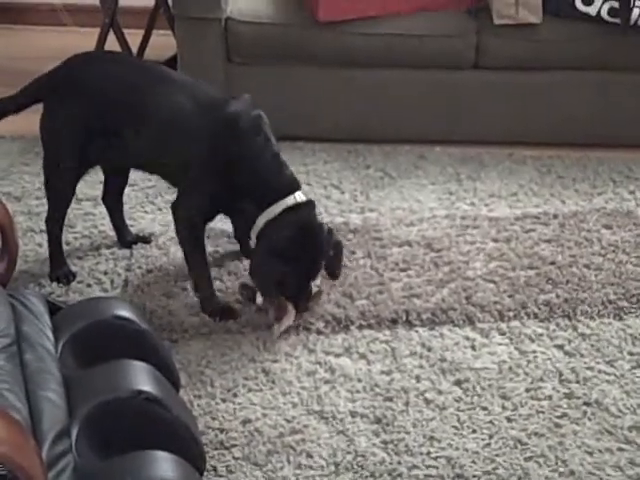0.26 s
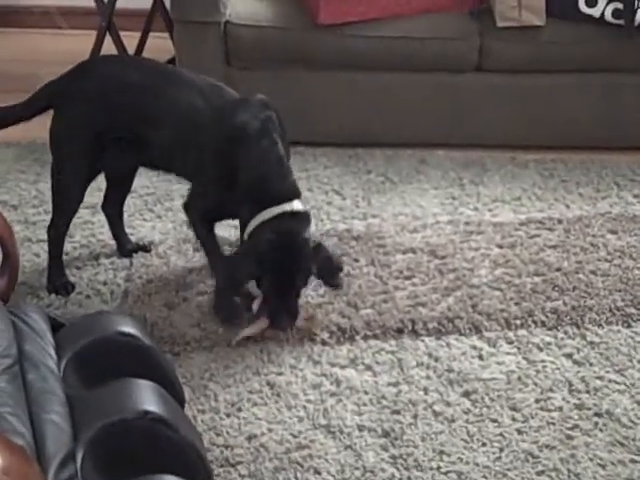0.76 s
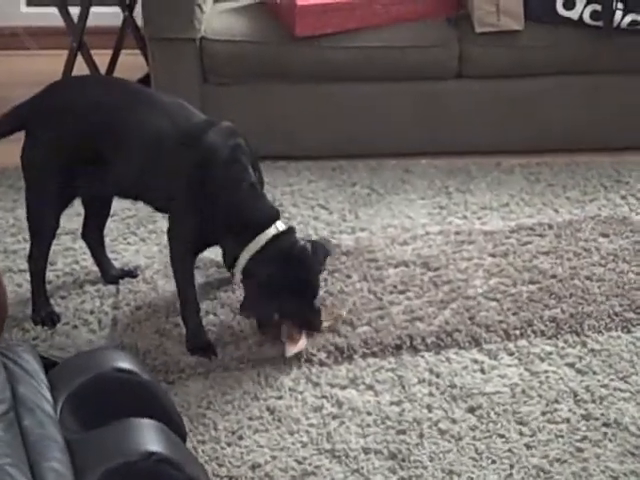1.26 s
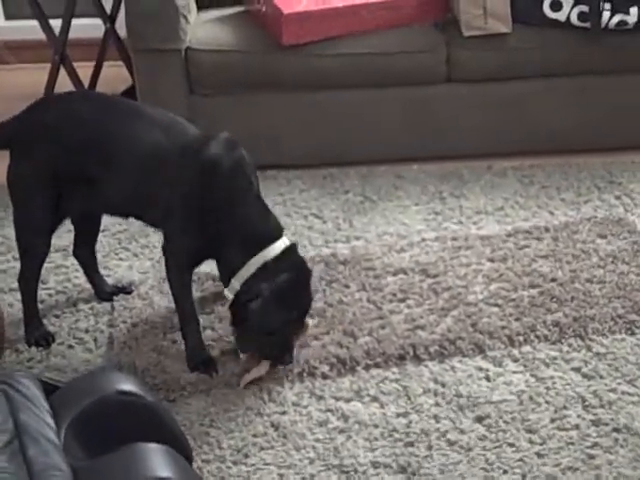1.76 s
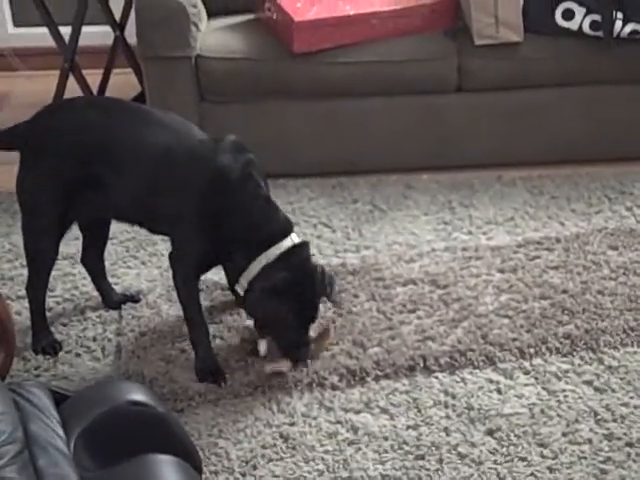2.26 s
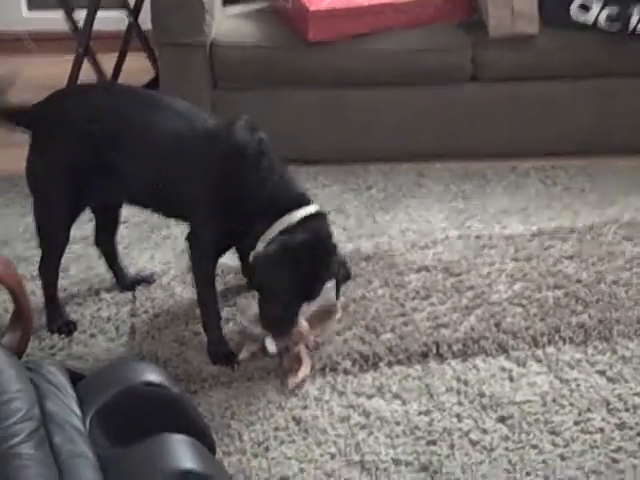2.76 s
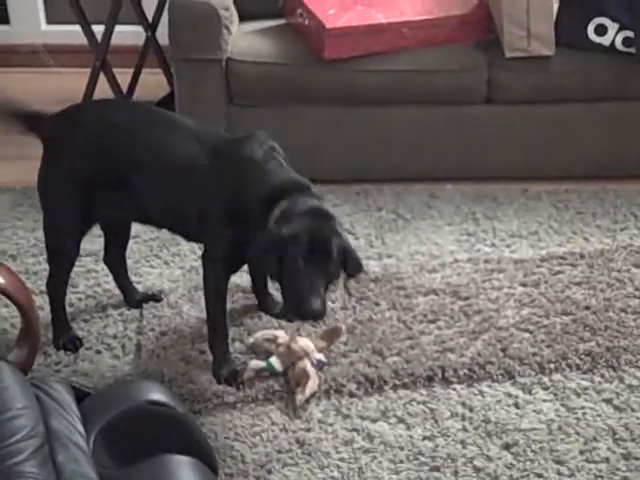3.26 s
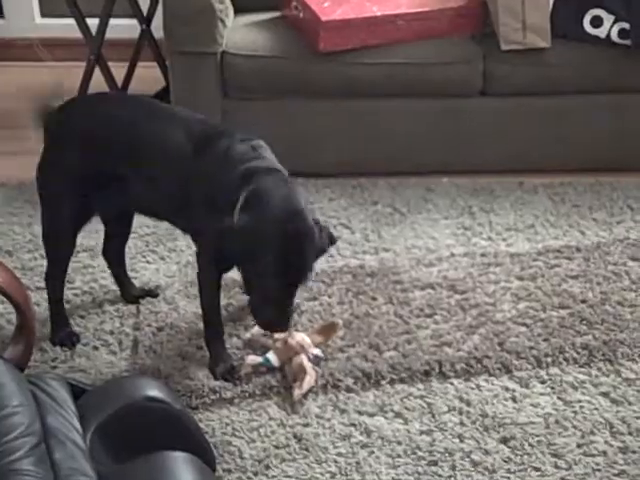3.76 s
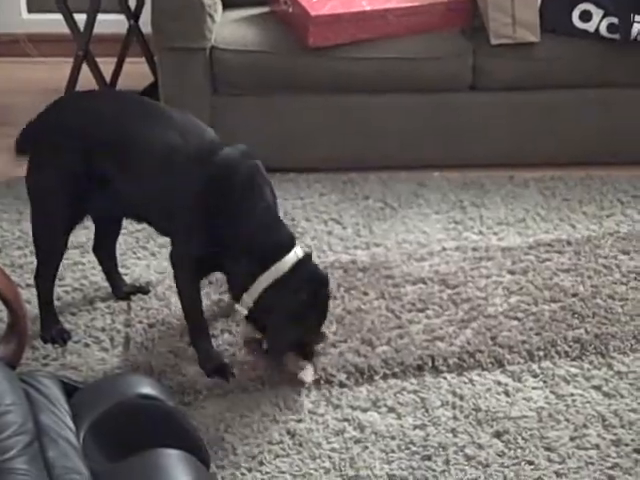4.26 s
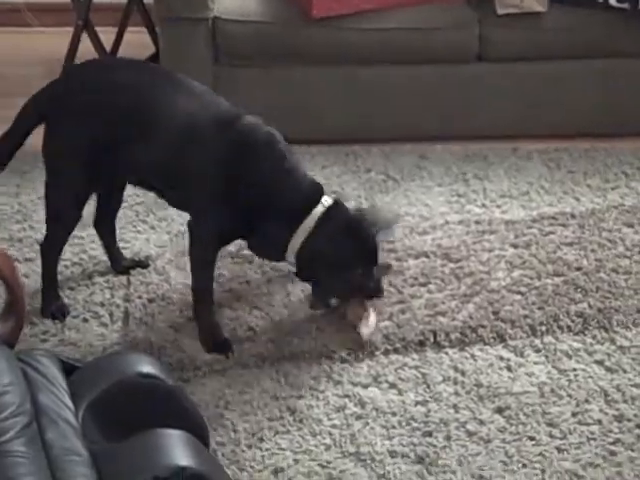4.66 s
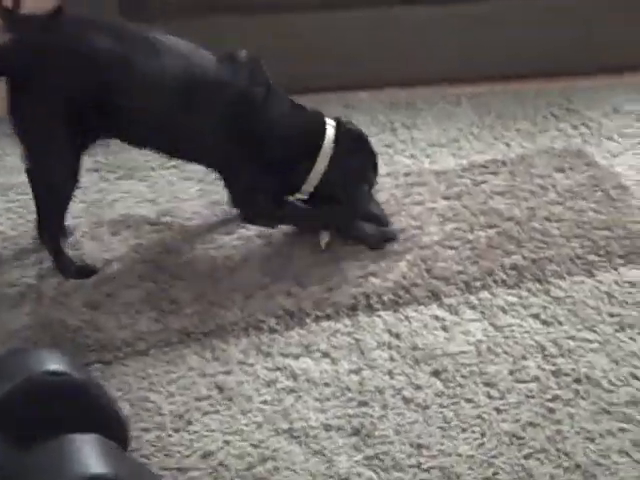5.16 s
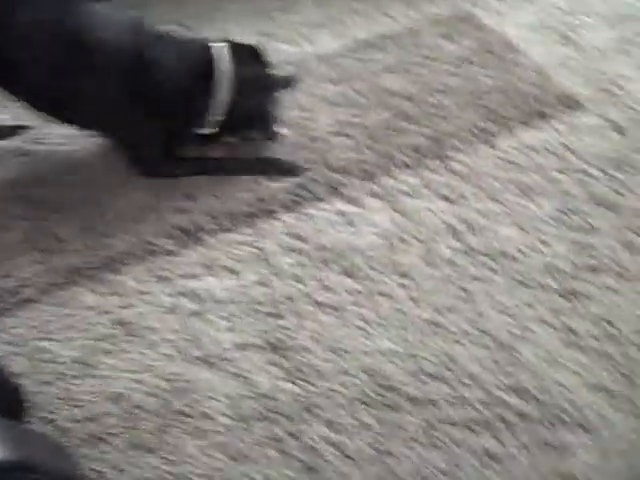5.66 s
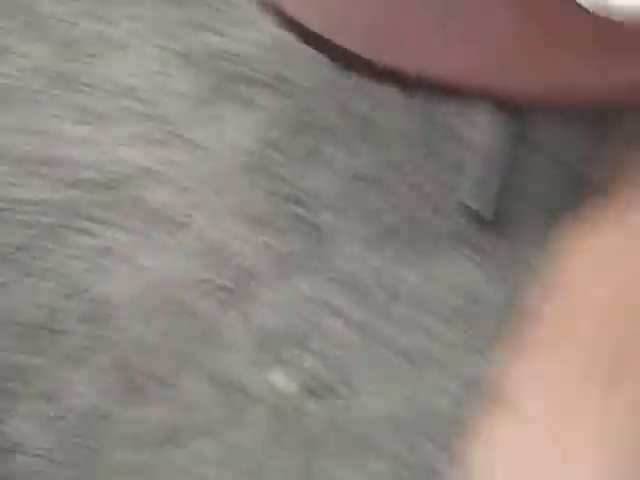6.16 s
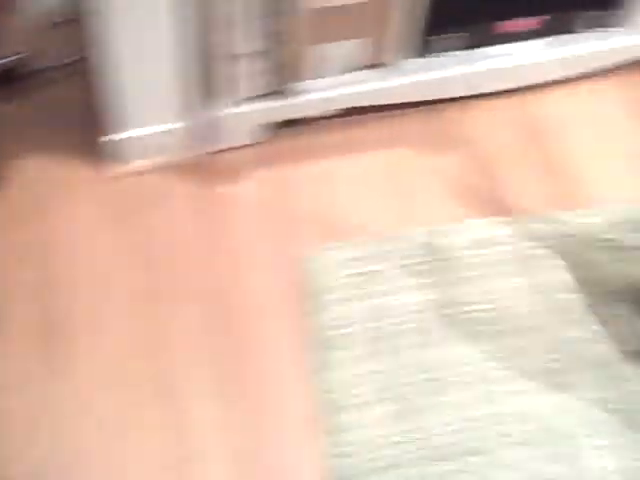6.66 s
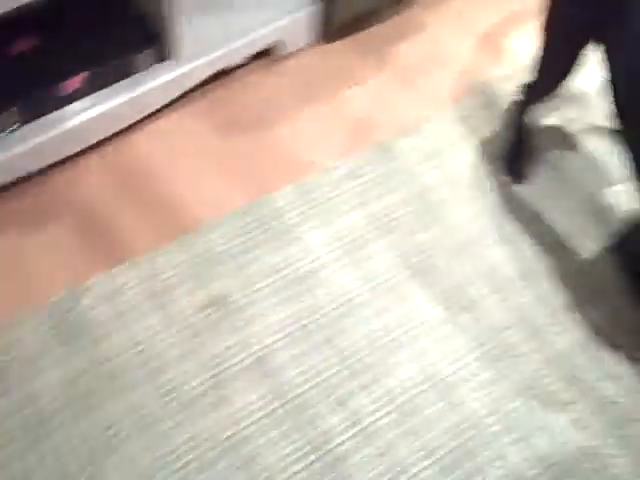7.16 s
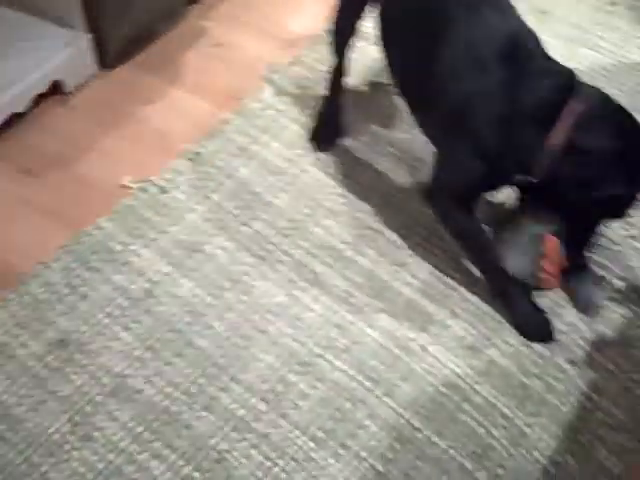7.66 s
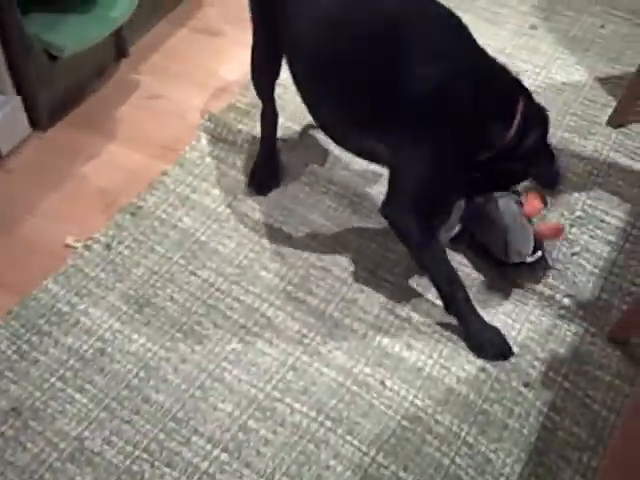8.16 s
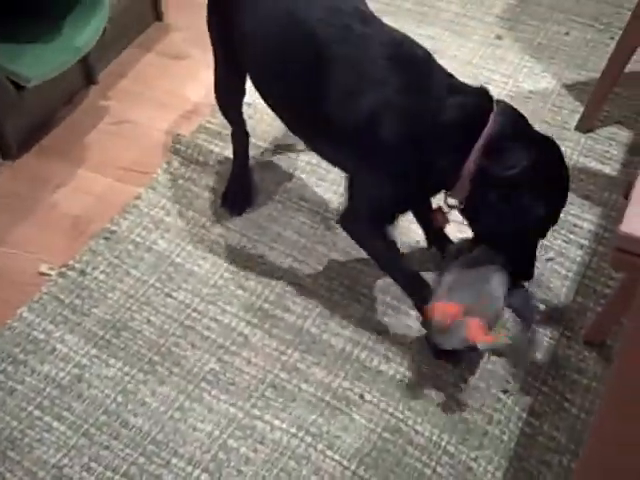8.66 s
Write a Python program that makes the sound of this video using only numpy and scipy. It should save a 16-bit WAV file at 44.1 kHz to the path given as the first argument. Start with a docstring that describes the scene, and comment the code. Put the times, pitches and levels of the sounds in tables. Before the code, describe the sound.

A dog chews a squeaky toy on a rug in short squeaky bursts, then collar tags jingle, paws scuff, and a second toy grunts.

```python
"""Two dogs chew squeaky toys on the rugs of a living room, over faint air and the hum of an appliance.
From the start, bites drive a reed up in pitch, many until it chokes and hisses; a lower reed sounds on refilling.
Paws soon pad and scuff on the pile as filtered noise; then collar tags jingle as sets of decaying modes.
Hard clicks are scattered throughout, and dry knocks on the camera body join halfway.
Late on, the second toy grunts in trains of air pulses, and one last muted bite follows."""
import sys
import numpy as np
from scipy import signal
from scipy.fft import rfft, irfft
from scipy.io import wavfile

SR = 44100
rng = np.random.default_rng(int(sys.argv[2]) if len(sys.argv) > 2 else 0)


def wav_out(sig):
    """Save sig, one row per channel (or a flat mono array), as 16-bit PCM at SR to the path in sys.argv[1]."""
    wavfile.write(sys.argv[1], SR, np.round(np.clip(np.atleast_2d(sig).T, -1, 1) * 32767).astype(np.int16))


N = 393372  # length in samples
TOP_HZ = 16000  # upper limit of the reed harmonics and of the output

# Body of the toy around the squeezed reed. Each row: frequency in Hz, relative gain in dB.
BITE_COLOUR = [(1200, 2), (1800, -4.5), (2700, -5), (3400, -10), (4000, -14.5), (5300, -13), (6600, -7.5),
               (8000, -13), (10000, -23.5), (11500, -32), (16000, -37)]
# Spectrum of air forced through the choked or leaking reed. Each row: frequency in Hz, relative gain in dB.
HISS_COLOUR = [(200, -36), (900, -8.5), (1500, 3), (2600, -0.5), (4000, -1.5), (5500, 3), (7000, -0.5),
               (8000, -4.5), (9500, -9), (12000, -23), (16000, -18.5)]


def undb(db):
    """Amplitude ratio: twenty decibels are a factor of ten."""
    return 10 ** (np.asarray(db) / 20)


def clock(length):
    """Sampling: the instants, in seconds, that span a length in seconds."""
    return np.arange(max(int(length * SR), 8)) / SR


def unit(x):
    """Normalization: scale to a root mean square of 1."""
    return x / np.sqrt(np.mean(x ** 2) + 1e-18)


def add(out, s, x):
    """Superposition: sum x into out from time s in seconds."""
    i = int(s * SR)
    out[i:i + len(x)] += x[:max(N - i, 0)]


def along(points, hz):
    """Interpolation of (Hz, value) rows on a logarithmic frequency axis."""
    f, value = np.transpose(points)
    return np.interp(np.log(hz + 1), np.log(f), value)


def colour(x, points):
    """Minimum-phase filtering: folding the cepstrum makes a causal body from (Hz, dB) rows."""
    size = 2048
    gain = undb(along(points, np.fft.rfftfreq(size, 1 / SR)))
    cepstrum = irfft(np.log(gain))
    cepstrum[1:size // 2] *= 2
    cepstrum[size // 2 + 1:] = 0
    impulse = irfft(np.exp(rfft(cepstrum)))
    return signal.fftconvolve(x, impulse)[:len(x)]


def band(x, hz, width):
    """Second-order resonance: one broad peak, its width a share of its centre."""
    w = 2 * np.pi * min(hz, SR / 3) / SR
    a = np.sin(w) * width / 2
    return signal.lfilter([a, 0, -a], [1 + a, -2 * np.cos(w), 1 - a], x)


def noise(t):
    """White noise: independent normal samples, as many as in t."""
    return rng.standard_normal(len(t))


def walk(t, rate):
    """Slow random modulation: normal levels, rate a second, joined by straight lines."""
    count = int(t[-1] * rate) + 2
    return np.interp(t * rate, np.arange(count), rng.standard_normal(count))


def decay(t, t60):
    """Exponential decay: the level falls by 60 dB in t60 seconds."""
    return np.exp(-np.log(1000) * t / t60)


def gate(t, edge):
    """Linear onset and release: ramps of edge seconds at both ends."""
    return np.clip(np.minimum(t, t[-1] - t) / edge, 0, 1)


def room(x, wet_db):
    """Diffuse reverberation: each band of a noise tail decays at its own rate."""
    # Each row: frequency in Hz, decay time by 60 dB in seconds.
    room_t60 = [(150, 0.76), (1000, 0.46), (3000, 0.3), (7000, 0.4), (15000, 0.21)]
    t = clock(.6)
    edges = np.geomspace(60, 16000, num=9)
    tail = 0
    for lo, hi in zip(edges, edges[1:]):
        band_filter = signal.butter(2, [lo, hi], "band", fs=SR, output="sos")
        part = signal.sosfilt(band_filter, noise(t))
        tail = tail + part * decay(t, along(room_t60, np.sqrt(lo * hi)))
    tail *= np.clip((t - .004) / 0.0044, 0, 1)  # the rug swallows the earliest bounce
    tail /= np.linalg.norm(tail)
    return x + undb(wet_db) * signal.fftconvolve(x, tail)[:N]


def background():
    """Stationary sound: coloured noise of room air, and appliance hum as lines that waver slightly."""
    # Spectrum of the air. Each row: frequency in Hz, relative gain in dB.
    air_colour = [(25, 0), (60, -13), (120, -11.5), (170, -16), (230, -11), (300, -13), (480, -12.5),
                  (680, -14), (880, -9), (1300, -13), (3000, -17), (6000, -25), (9000, -21.5), (16000, -38)]
    # Lines of the hum. Each row: frequency in Hz, mean level in dB.
    hum_lines = [(120, -90.5), (242, -79), (479, -84.5), (899, -71), (1755, -85)]
    t = np.arange(N) / SR
    air_db = -63 + 2.7 * walk(t, 6.1)
    air = unit(colour(noise(t), air_colour)) * undb(air_db)
    hum = 0
    for hz, db in hum_lines:
        line_db = db + 1.8 * walk(t, 9)
        phase = 2 * np.pi * hz * t + hz / 1400 * walk(t, 20)
        hum = hum + undb(line_db) * np.sin(phase)
    return air + np.sqrt(2) * hum  # a sine of rms 1 peaks at the root of 2


def pads():
    """Damped impact: paws and toys land, and every landing dies away in the pile alike."""
    # Each row: start in seconds, relative level in dB, centre frequency in Hz.
    landings = [(1.645, -52.5, 235), (1.837, -53, 1170), (2.78, -54.5, 223), (3.497, -58, 140),
                (4.208, -37.5, 746), (5.157, -48, 547), (5.437, -49.5, 847), (5.88, -49, 550),
                (6.033, -34.5, 1340), (6.519, -46.5, 374), (6.687, -49.5, 1020), (6.838, -49.5, 250),
                (6.885, -48, 420), (7.087, -40.5, 960), (8.798, -48, 760)]
    t60 = 0.086  # seconds
    out, t = np.zeros(N), clock(t60)
    for s, db, hz in landings:
        grains = noise(t) * undb(3 * walk(t, 400))
        fibres = unit(band(band(grains, hz, 1.3), hz, 1.8))
        add(out, s, undb(db) * fibres * decay(t, t60) * gate(t, 0.0015))
    return out


def scuffs():
    """Friction noise: plush and paws brush many fibres in a grainy swish that swells and fades."""
    # Each row: start in seconds, length in seconds, relative level in dB, centre frequency in Hz.
    strokes = [(1.544, .095, -56.5, 1040), (1.815, 0.082, -53.5, 1000), (2.453, 0.17, -50.5, 1970),
               (3.244, .12, -63, 1460), (3.707, .13, -57, 3430), (5.654, 0.054, -50, 4540),
               (6.529, 0.12, -56, 726), (6.847, .15, -42, 1717), (7.096, .24, -58, 1220),
               (7.422, 0.15, -54.5, 1398), (7.902, 0.13, -54.5, 824)]
    # Spectrum of a swish on the pile. Each row: frequency in Hz, relative gain in dB.
    swish = [(150, 3), (400, 3), (1200, 4), (2300, -4), (3200, -5.5), (4300, -2), (6000, -11), (9000, -8.5),
             (16000, -16)]
    out = np.zeros(N)
    for s, length, db, hz in strokes:
        t = clock(length)
        grains = noise(t) * undb(3.9 * walk(t, 604))
        fibres = colour(band(grains, hz, 2.0), swish)
        add(out, s, undb(db) * unit(fibres) * np.sin(np.pi * t / t[-1]) ** 2)
    return out


def knocks():
    """Structure-borne sound: blows reach the microphone through the camera body, with no room."""
    # Each row: start in seconds, peak of the blow in dB.
    blows = [(5.7481, -22), (5.751, -29), (5.917, -25), (7.684, -40), (7.868, -37.5), (8.079, -39.5)]
    # Response of the body. Each row: frequency in Hz, relative gain in dB.
    body = [(30, 20.5), (120, 13), (300, 17.5), (900, 12), (2000, 13), (5000, -10), (8000, -42),
            (12000, -46), (16000, -26)]
    out, t = np.zeros(N), clock(0.074)
    for s, db in blows:
        blow = colour(noise(t) * np.exp(-t / 0.001), body)
        thud = unit(band(noise(t), 80, 3)) * np.exp(-t / .02)
        add(out, s, undb(db) * (blow / np.abs(blow).max() + undb(-25.5) * thud))
    return out


def clicks():
    """Impulse excitation: teeth, claws and buckles give a spike and milliseconds of rattle."""
    # Each row: start in seconds, peak of the direct sound in dB, centre frequency in Hz.
    contacts = [(.432, -39.5, 5000), (3.263, -39.5, 5900), (3.545, -33.5, 3570), (5.589, -19, 2730),
                (5.596, -25, 5560), (6.010, -28, 3000), (6.015, -24, 2900), (7.093, -27.5, 4593),
                (7.650, -33.5, 1970), (8.4, -41.5, 11000)]
    out, t = np.zeros(N), clock(.04)
    for s, db, hz in contacts:
        rattle = 0.76 * noise(t) * np.exp(-t / 0.0021)
        tick = band((t == 0) + rattle, hz, 0.94)
        add(out, s, undb(db) * tick / np.abs(tick).max())
    return out


def ring(modes, db):
    """Modal decay: each blow shares itself differently among modes that waver as the tag swings."""
    t, out = clock(.35), 0
    for hz, mode_db, t60 in modes:
        swing = 1 + .001 * rng.standard_normal() + .0024 * walk(t, 150)
        # the tag turns toward and away from the microphone
        facing_db = rng.uniform(-4, 4) + 2.5 * walk(t, 45)
        size = undb(db + mode_db + facing_db) * decay(t, t60)
        turns = np.cumsum(hz * swing) / SR + rng.random()
        out = out + size * np.sin(2 * np.pi * turns)
    return out


def tags():
    """Collision of two metal tags: they clash, chatter and ring; swinging collars add light ticks."""
    # Clashes. Each row: start in seconds, relative clash level in dB, relative ring level in dB.
    jingles = [(2.9063, -43, -45), (2.9449, -29.5, -49), (2.9643, -26, -45.5), (3.0526, -37, -43),
               (3.0811, -37, -39), (3.3382, -35, -45), (3.3858, -24, -34.5), (3.6296, -34, -48.5),
               (3.899, -43, -52), (5.7057, -23.5, -46), (5.7477, -14.5, -34.5), (5.7793, -24, -56),
               (5.88, -30, -60), (5.918, -21, -40), (6.009, -21.5, -42), (6.118, -26.5, -41.5),
               (6.2385, -21.5, -42), (6.5171, -31, -50), (7.2574, -32, -46.5), (7.6843, -22.5, -43),
               (7.7941, -27.5, -41), (7.8697, -22.5, -51), (8.077, -19.5, -40.5), (8.0855, -35, -36),
               (8.1349, -27, -47), (8.3295, -39, -52.5), (8.6241, -32.5, -48.5)]
    # Swinging collars. Each row: start in seconds, end in seconds, ticks per second, relative level in dB.
    swings = [(2.778, 3.151, 28, -54), (5.598, 6.7, 13.7, -53.5), (6.949, 7.902, 22, -57.5),
              (8.166, 8.713, 9.8, -84)]
    # Modes of the large tag, the small tag and the high ring that both share.
    # Each row: frequency in Hz, relative level in dB, decay time by 60 dB in seconds.
    large_tag = [(5545, -7, .11), (7172, -3, .27), (8259, 0, .29), (10425, -13, .2)]
    small_tag = [(7960, 4, 0.05), (8000, -15, 0.071), (12900, -15, .08), (12760, -3, 0.03)]
    high_ring = [(13400, -1.5, 0.053), (15017, -9.5, 0.115), (15200, -18, 0.092)]
    # chatter and high ring follow the clash level, the tags follow the ring level
    chatter_db, high_ring_db, large_tag_db = -12, -16, -5
    out, t = np.zeros(N), clock(.05)
    for s, clash_db, ring_db in jingles:
        fading = np.exp(-t / 0.0032) + 0.32 * np.exp(-t / .014)
        chatter = noise(t) * undb(2.2 * walk(t, 850)) * fading
        add(out, s, undb(clash_db + chatter_db) * band(chatter, 8800, 1.36))
        large = ring(large_tag, ring_db + large_tag_db)
        # the large tag rings freely only once the two part
        parting = 1 - np.exp(-np.arange(len(large)) / SR / 0.0029)
        add(out, s, large * parting)
        add(out, s, ring(small_tag, ring_db) + ring(high_ring, clash_db + high_ring_db))
    for start, end, rate, db in swings:
        for when, force in rng.random((int(rate * (end - start)), 2)):
            s = start + when * (end - start)
            blow_db = db + 10 * (force - .5)
            tick = band(noise(t) * np.exp(-t / 0.0042), 4900, 4.6)
            add(out, s, undb(blow_db + 7.5) * tick)
            # tags that lie against each other damp a light touch at once
            touch = ring(small_tag, blow_db) + ring(high_ring, blow_db)
            add(out, s, touch[:len(t)] * np.exp(-t / 0.021))
    return out


def grunts():
    """Pulsed airflow: in the second toy a slack flap slaps shut a few times and rings its tube."""
    # Each row: start in seconds, length in seconds, start rate in Hz, end rate in Hz, relative level in dB.
    puffs = [(7.308, 0.0467, 210.4, 200.5, -37.5), (7.517, .038, 171.1, 117.7, -45)]
    # Resonances of the tube. Each row: frequency in Hz, relative gain in dB.
    tube = [(100, -37), (400, -9.5), (700, -7.5), (1050, 5), (1400, 3.5), (1900, -3.5), (3000, -13),
            (4300, -9), (6200, -28), (7700, -17), (10000, -26), (16000, -55)]
    out = np.zeros(N)
    for s, length, start_hz, end_hz, db in puffs:
        t = clock(length + 0.0057)
        rate = np.interp(t, [0, length], [start_hz, end_hz])
        turns = np.cumsum(rate * (1 + .05 * walk(t, 200))) / SR
        pulses = unit(np.diff(np.floor(turns), prepend=0))  # one per completed turn
        slaps = pulses + undb(-0.5) * noise(t)
        add(out, s, undb(db) * unit(colour(slaps * np.sin(np.pi * t / t[-1]), tube)))
    return out


def reed(t, hz, points, bright_db, jitter, flicker_db):
    """Beating reed: harmonics of a slightly unsteady pitch, coloured by the toy around it."""
    phase = 2 * np.pi * np.cumsum(hz * (1 + jitter * walk(t, 702))) / SR
    bent_db = -9 * np.log2(np.maximum(hz / 1500, 1))  # bent far, it barely beats and nearly whistles
    tone, power = 0, 0
    for k in range(1, 16):
        overtone = np.clip(np.log(k) / np.log(5), 0, 1)  # no brightening at k = 1, all of it from k = 5
        db = along(points, k * hz) + (bright_db + bent_db) * overtone
        db = db + flicker_db * walk(t, 59.6)
        size = undb(db) * (k * hz < TOP_HZ)
        flutter = 14 * jitter * np.sqrt(k - 1) * walk(t, 496)  # turbulence frays the overtones
        tone = tone + size * np.sin(k * phase + flutter + rng.uniform(0, 2 * np.pi))
        power = power + size ** 2 / 2
    return tone / np.sqrt(power) * gate(t, 0.0013)


def muffling_db(s):
    """Obstruction: gain of the overtones at time s, by how far the dog covers the toy."""
    # The squeaks go dull as the dog lies over the toy. Each row: time in seconds, overtone gain in dB.
    muffling = [(.6, 2), (1.4, -1), (2.2, 3.5), (4.4, 2.5), (4.7, 3), (5.0, -2), (5.5, -4), (5.9, -21),
                (6.3, 6)]
    return np.interp(s, *np.transpose(muffling))


def refills():
    """Suction-driven reed: the toy springs back and draws air in an arch of pitch."""
    # Each row: start in seconds, rise in seconds, fall in seconds, top pitch in Hz, relative level in dB.
    breaths = [(.733, 0.0084, 0.049, 1114, -35), (1.123, 0.039, 0.05, 964, -40.5),
               (1.370, 0.039, 0.04, 974, -37), (1.931, 0.0041, 0.013, 917, -42),
               (2.554, 0.048, .082, 1069, -36.5), (4.394, 0.066, 0.038, 994, -39),
               (4.665, 0.061, 0.047, 1020, -38), (4.976, .055, .054, 1048, -37),
               (5.497, 0.028, .034, 996, -39.5), (5.95, .016, 0.032, 977, -42.5),
               (6.478, 0.042, 0.049, 1005, -46.5)]
    # Body around the lower reed. Each row: frequency in Hz, relative gain in dB.
    body = [(900, 6.5), (1900, -4), (2900, -9), (3900, -17.5), (5000, -25), (6200, -23), (7500, -17),
            (9500, -21), (11500, -32.5), (16000, -42)]
    climb_hz_per_s, swell_db_per_s = 2000, 169  # mean climb of pitch and of level over the rise
    brighten_db_per_s = 129  # a longer rise has brighter overtones throughout
    full_hz, full_db = 823, -7  # pitch, and level relative to its peak, at which every refill dies
    out = np.zeros(N)
    for s, rise, fall, top_hz, db in breaths:
        t = clock(rise + fall)
        corners = [0, rise, rise + fall]
        up = np.clip(t / rise, 0, 1)
        down = np.clip((t - rise) / fall, 0, 1)
        climb = climb_hz_per_s * rise * np.cos(np.pi / 2 * up) ** 2
        hz = top_hz - climb + (full_hz - top_hz) * down ** 1.3
        suction_db = np.interp(t, corners, [-1, 0, -5])  # the overtones fade as the toy fills
        bright_db = -1 + brighten_db_per_s * rise + suction_db + muffling_db(s)
        unsteady_hz = hz * (1 + 0.0075 * walk(t, 67.5))
        tone = reed(t, unsteady_hz, body, bright_db, jitter=0.017, flicker_db=4.5)
        leak = undb(-20.5 + suction_db) * unit(colour(noise(t), HISS_COLOUR)) * gate(t, 0.0027)
        level_db = db + np.interp(t, corners, [-swell_db_per_s * rise, 0, full_db])
        add(out, s, undb(level_db) * (tone + leak))
    return out


def squeeze(rise, speak_hz, top_hz, bend, bright_db, jitter):
    """Pressure-bent reed: its period shortens so that the pitch climbs ever faster."""
    t = clock(rise)
    u = t / t[-1]
    shortening = .3 * u + .7 * u ** 3
    hz = 1 / (1 / speak_hz + (1 / top_hz - 1 / speak_hz) * shortening)
    swell_db = np.interp(u, [0, .65, 1], [-10, 0, -3]) * bend ** 0.5
    return undb(swell_db) * reed(t, hz, BITE_COLOUR, bright_db, jitter, flicker_db=3.0)


def release(choked, fall, top_hz, bend, bright_db, jitter):
    """Relaxing reed: the pitch slides down, weaker the longer the choked toy has lost air."""
    reopen_hz, stop_hz = 3600, 1185  # the reed speaks again high after choking, and stops low
    spent_db_per_s = 118
    t = clock(fall)
    u = t / t[-1]
    from_hz = reopen_hz if choked > .008 else top_hz
    # a hard-bent reed drops at once, a lightly bent one sags late
    hz = from_hz + (stop_hz - from_hz) * u ** (1.8 - bend)
    sag = reed(t, hz, BITE_COLOUR, bright_db - 18 * bend, 1.7 * jitter, flicker_db=9.5)
    return undb(-2.5 - spent_db_per_s * choked - 2.7 * u) * sag


def hiss(rise, choked, fall):
    """Turbulent jet: escaping air hisses, and whistles in the nozzle at the height of a bite."""
    nozzle_hz = 6870
    # the whistle is strongest in a sudden bite, and less the slower the jaws close
    whistle_db, sudden_s, loss_db_per_s = 12, 0.012, 1700
    t = clock(rise + choked + fall)
    corners = [0, rise, rise + 0.14 * (choked + fall), t[-1]]
    flow = np.interp(t, corners, [0.14, 0.95, 0.76, 0.51]) ** 2 * gate(t, 0.0025)
    air = unit(colour(noise(t), HISS_COLOUR))
    whistle = unit(band(band(noise(t), nozzle_hz, 0.26), nozzle_hz, 0.26))
    fading = np.exp(-np.maximum(t - rise, 0) / 0.024)
    whistle_gain = undb(whistle_db - loss_db_per_s * max(rise - sudden_s, 0))
    return flow * (air + whistle_gain * fading * whistle)


def bites():
    """Pressure-driven reed: it bends upward, may be pinned so that only air passes, then slides down."""
    # Each row: start in seconds, rise in seconds, choked time in seconds, fall in seconds,
    # top pitch in Hz, relative reed level in dB, relative hiss level in dB.
    chews = [(0.58, .034, 0, 0.023, 2063, -28.5, -38.5), (.911, 0.028, .035, 0.015, 3680, -33, -46),
             (1.222, .017, 0.022, .02, 3400, -30, -35), (2.160, 0.00928, 0, 0.047, 1307, -33, -59),
             (2.386, 0.03, 0.052, 0.013, 3450, -31.5, -42), (4.181, 0.032, 0.049, .012, 2308, -36.5, -43),
             (4.502, .021, 0.07, 0.018, 3760, -29.5, -39), (4.832, 0.017, 0.047, 0.016, 2980, -34.5, -37),
             (5.323, .014, 0, .055, 1492, -35, -46.5), (5.756, .028, 0.0027, .034, 1680, -44, -41.5),
             (6.281, 0.038, 0, .066, 1650, -46, -39), (8.756, 0.027, 0.069, 0.053, 3600, -43.5, -40.5)]
    speak_hz = 1285  # pitch at which the squeezed reed starts
    gentle_db, dull_db = 4.5, 11.5  # overtones of a gentle bite, and their loss when bent by an octave
    out = np.zeros(N)
    for s, rise, choked, fall, top_hz, db, hiss_db in chews:
        bend = np.clip(np.log2(top_hz / speak_hz), 0, 1)  # octaves, at most one
        bright_db = gentle_db - dull_db * bend + muffling_db(s)
        jitter = 0.0016 + 0.015 * np.sqrt(bend)  # a hard bite drives the reed less steadily
        add(out, s, undb(db) * squeeze(rise, speak_hz, top_hz, bend, bright_db, jitter))
        sag = release(choked, fall, top_hz, bend, bright_db, jitter)
        add(out, s + rise + choked - .002, undb(db) * sag)
        add(out, s, undb(hiss_db) * hiss(rise, choked, fall))
    return out


def scene():
    """Superposition: toys, paws and collars sound in the room; the knocks stay dry."""
    toys = room(bites() + refills(), wet_db=-4.5) * undb(-0.5)
    movement = room(pads() + scuffs() + grunts(), wet_db=-3.5) * undb(2.5)
    metal = room(tags() + clicks(), wet_db=-7.5)
    return (toys + movement + metal + knocks() + background())[None]


def record(dry):
    """Low-pass filtering: a steep elliptic filter cuts the top of the treble."""
    low_pass = signal.ellip(8, .2, 70, TOP_HZ, fs=SR, output="sos")
    return signal.sosfilt(low_pass, dry)


dry = scene()
out = record(dry)
wav_out(out)
```